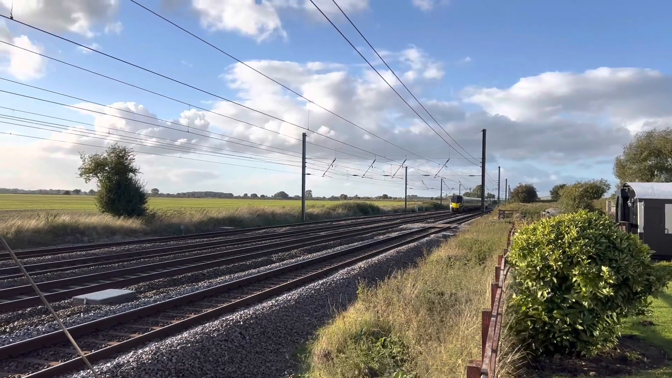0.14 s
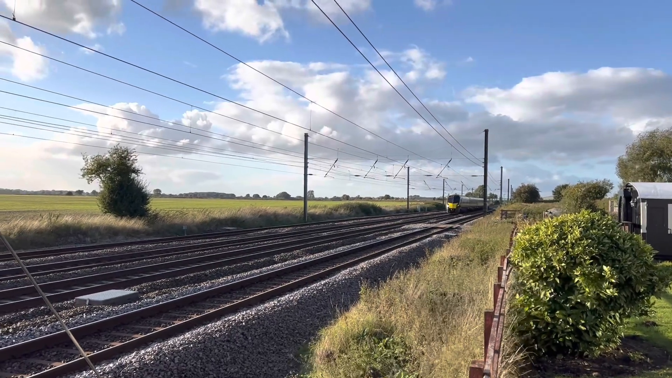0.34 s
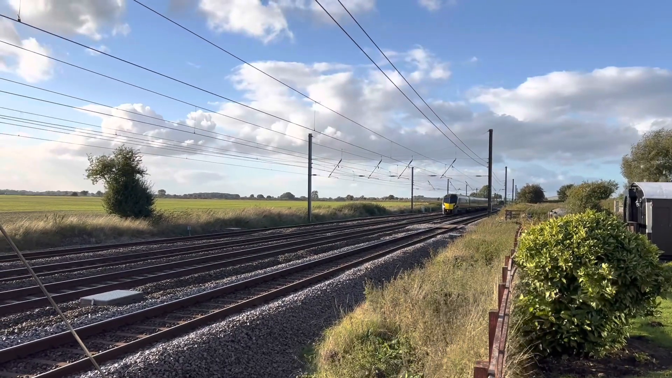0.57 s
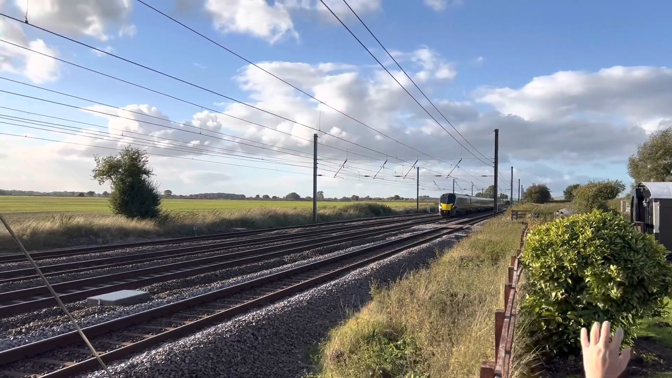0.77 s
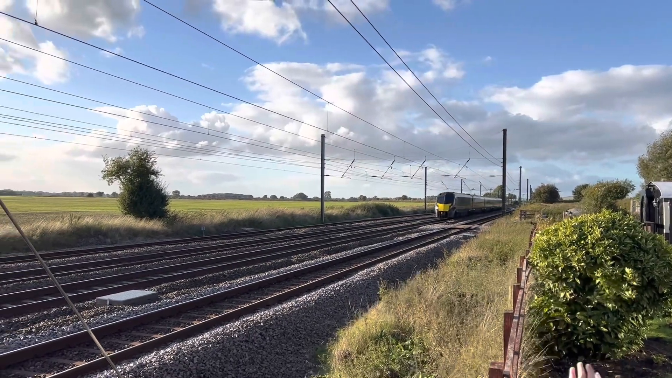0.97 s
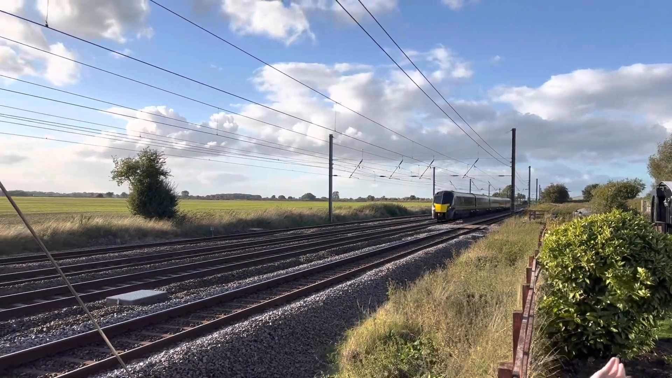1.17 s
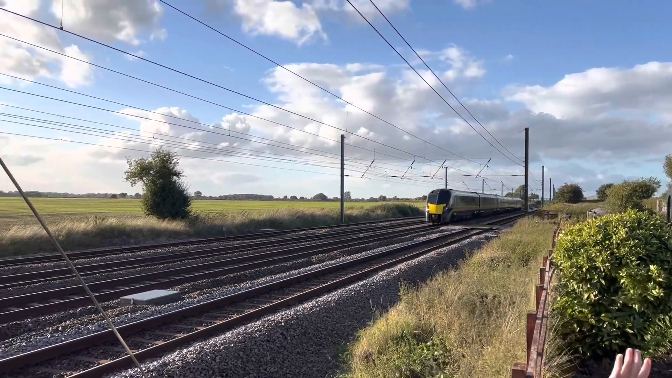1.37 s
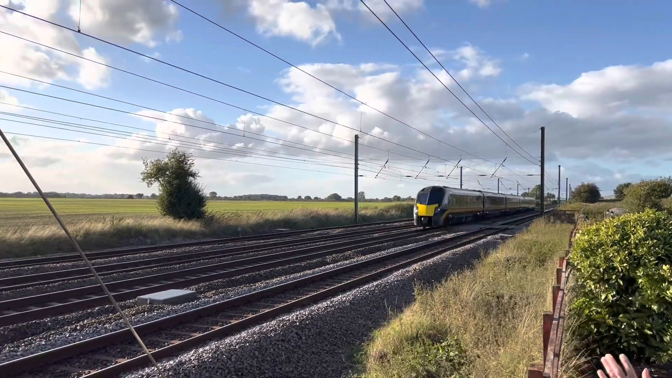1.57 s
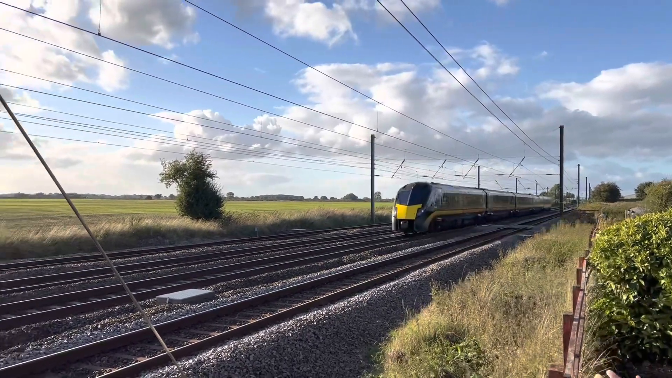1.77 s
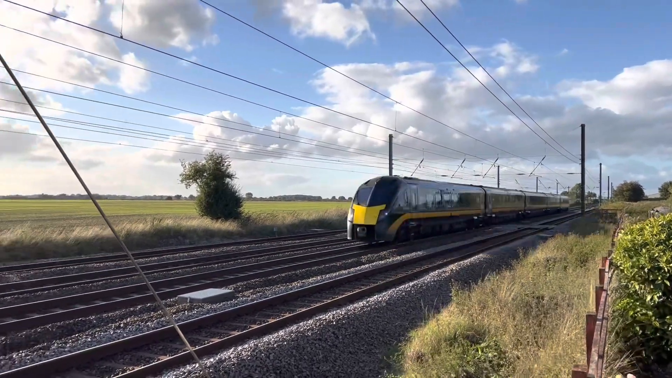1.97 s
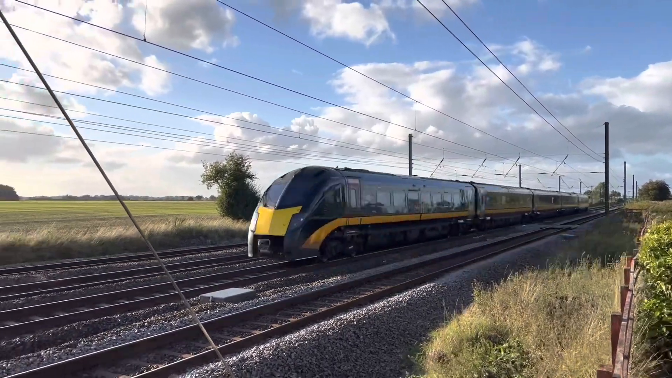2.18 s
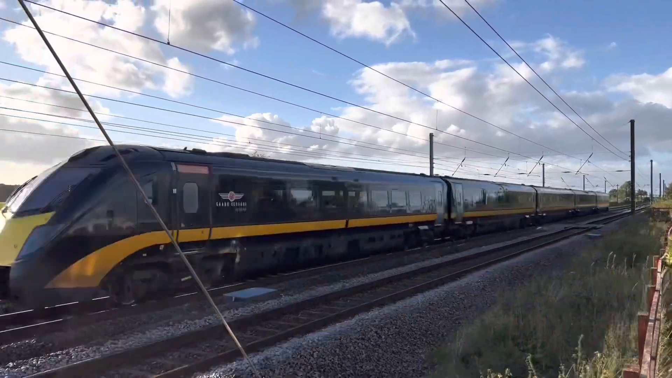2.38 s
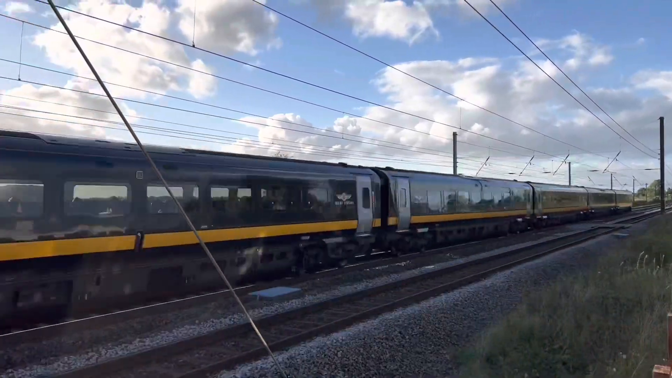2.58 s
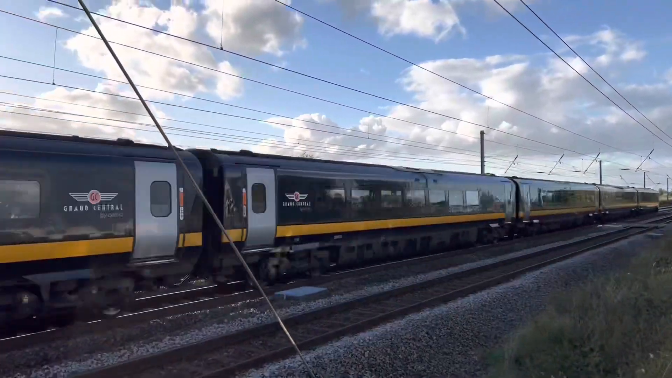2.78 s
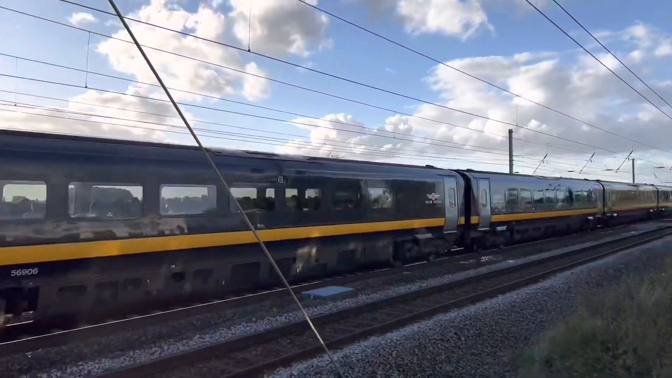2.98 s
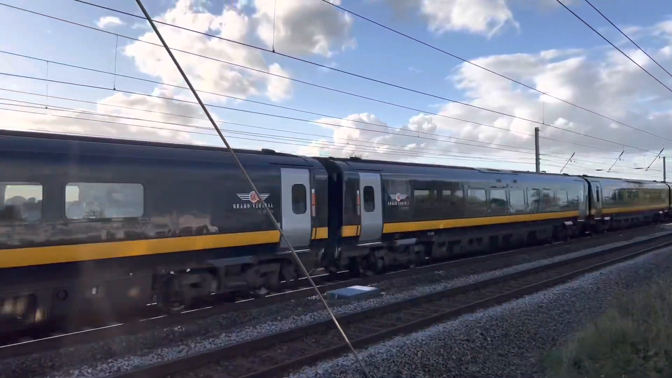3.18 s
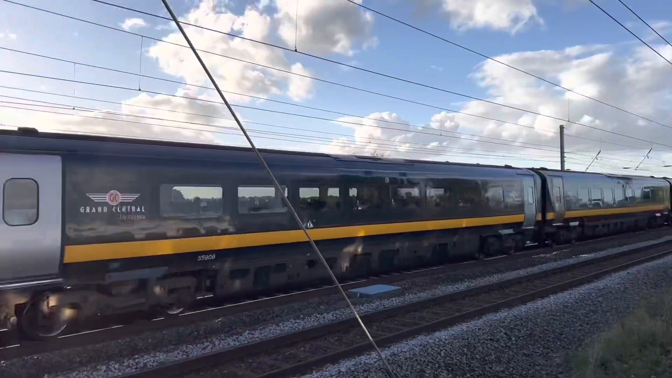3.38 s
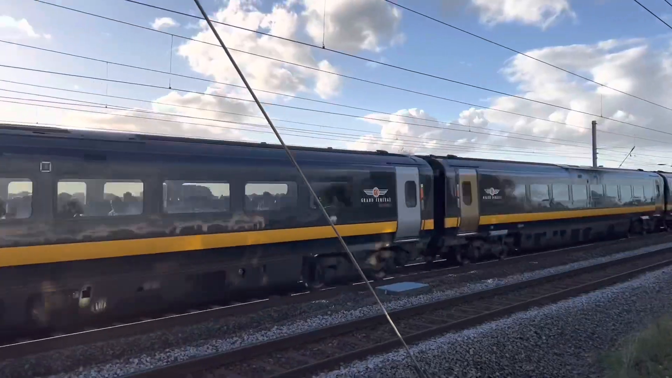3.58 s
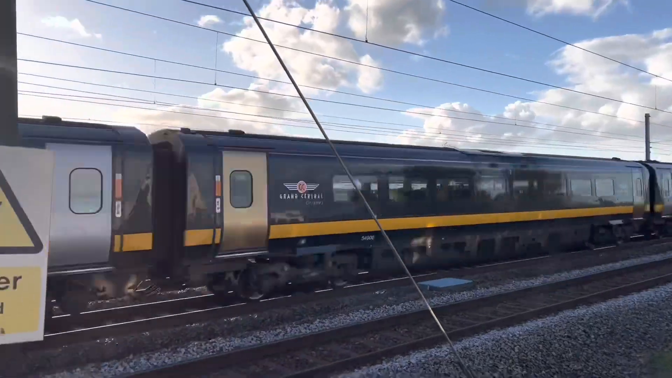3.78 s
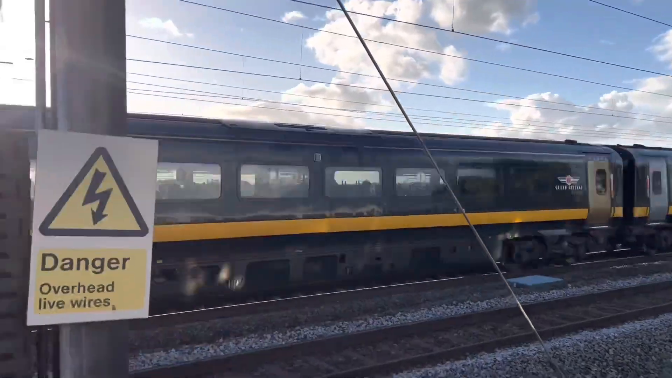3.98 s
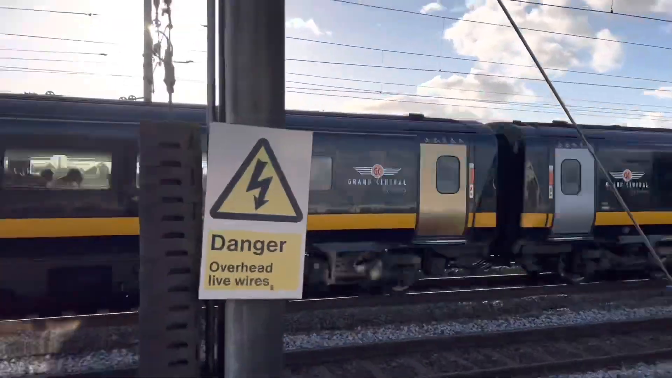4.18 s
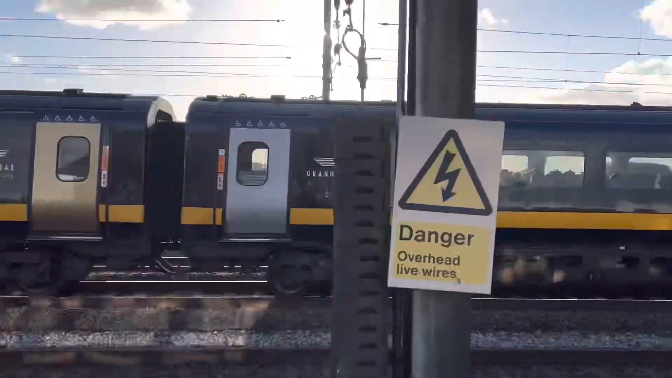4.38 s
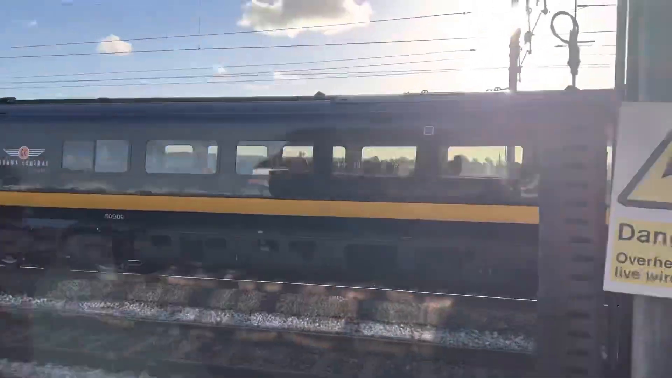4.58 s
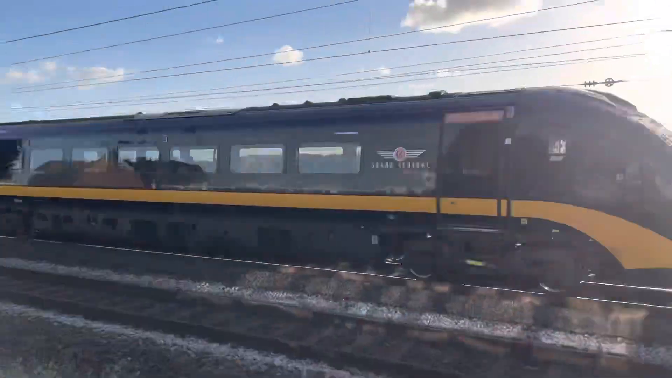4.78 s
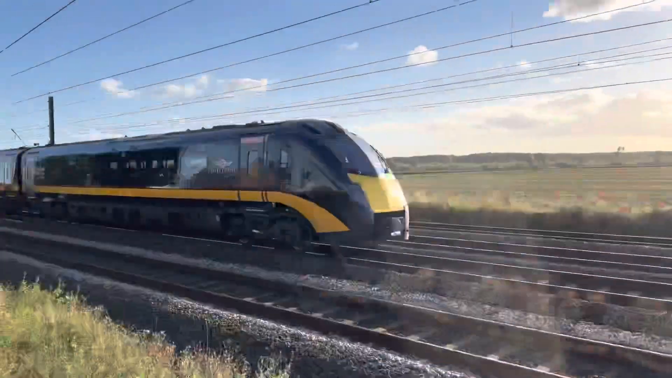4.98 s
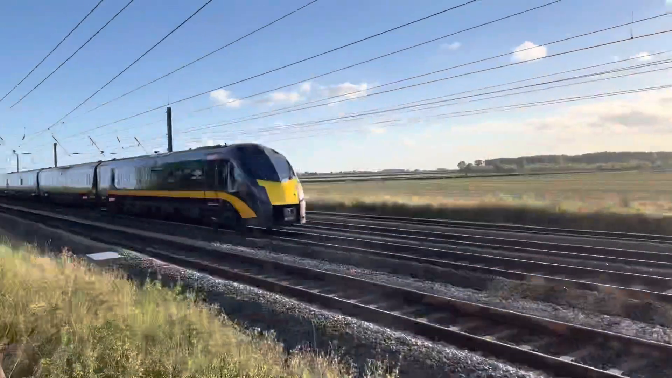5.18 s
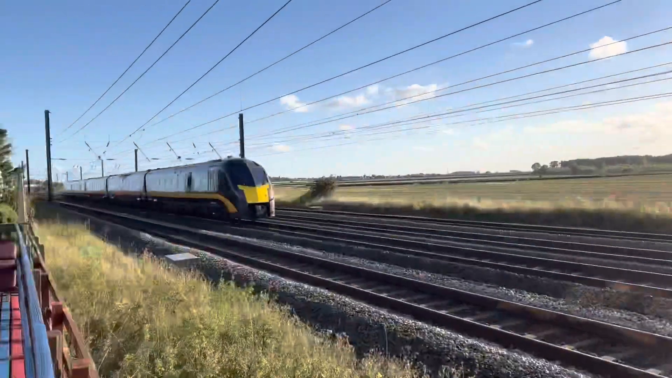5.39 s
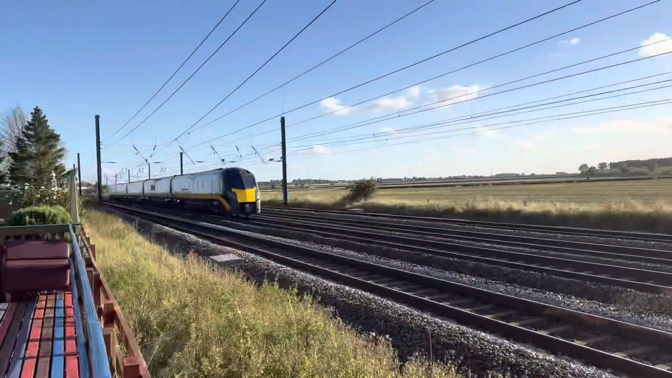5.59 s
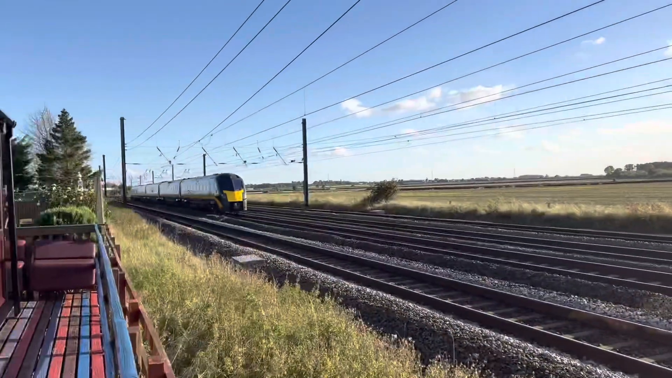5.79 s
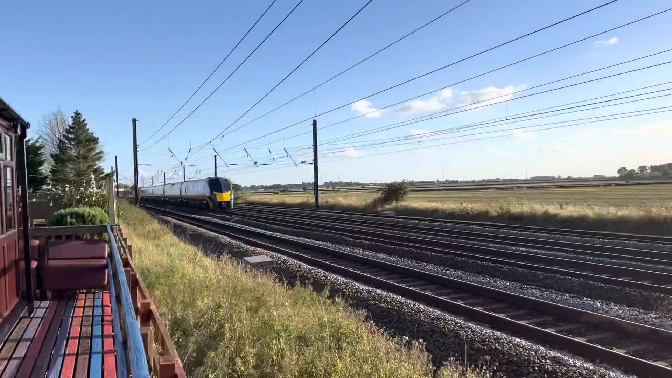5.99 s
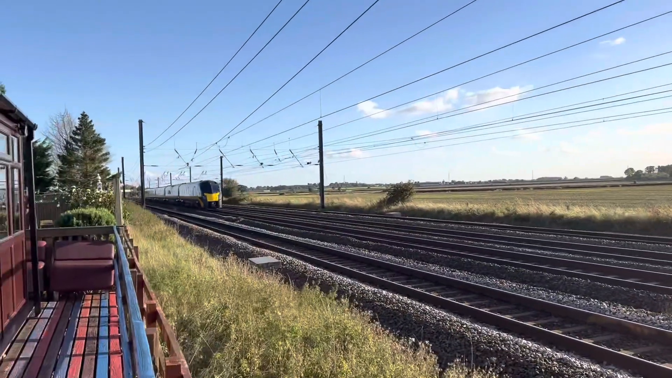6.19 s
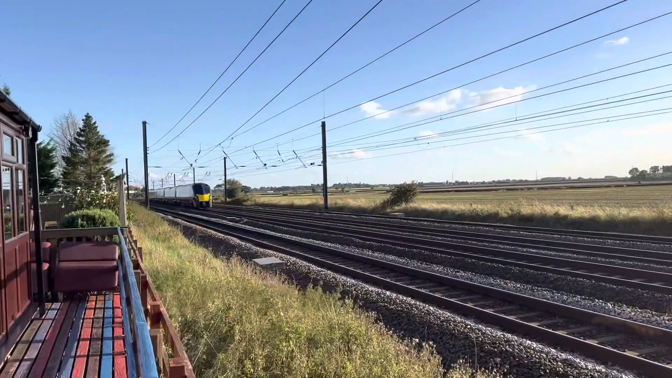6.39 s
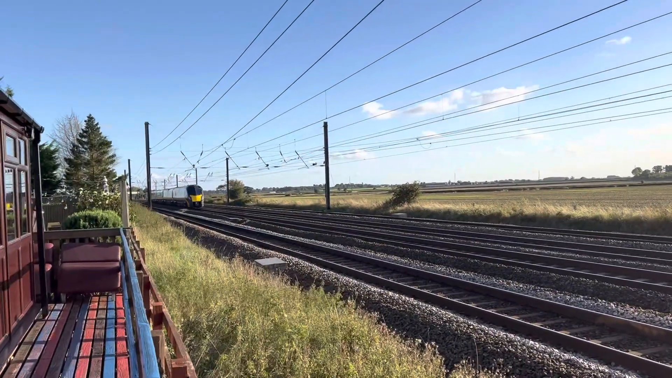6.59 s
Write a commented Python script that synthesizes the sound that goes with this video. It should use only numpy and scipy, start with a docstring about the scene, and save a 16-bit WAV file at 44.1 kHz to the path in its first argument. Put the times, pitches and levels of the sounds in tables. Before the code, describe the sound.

A passenger train passes at speed, close to a microphone held at the trackside in gusty wind. First come a thin, high singing from the rails and a far drone, broken by sharp slaps of wind on the microphone. Then the wheels rush by loudly for about three seconds, ringing and humming over a low flutter of air. The train recedes, and the wind eases with it.

```python
"""A passenger train passes at speed, close to a phone held beside the line in gusty wind.
0-2 s: the rails sing ahead of the train, far wheels drone, wind slaps the microphone ports.
2-5 s: near wheels roar and ring as the bogies go by; the train's draught adds to the buffeting.
From 5 s: the rails sing lower behind the train; roar and wind die away."""
import sys
import numpy as np
from scipy import signal
from scipy.fft import rfft, irfft, next_fast_len
from scipy.io import wavfile
from scipy.ndimage import uniform_filter1d, map_coordinates

SR = 44100
rng = np.random.default_rng(int(sys.argv[2]) if len(sys.argv) > 2 else 0)


def master_out(mix):
    """Clip the mix to full scale and print it as 16-bit PCM to the path in sys.argv[1]."""
    frames = np.transpose(np.atleast_2d(mix))
    ceiling = np.clip(frames, -1, 1)
    pcm = np.round(ceiling * 32767).astype(np.int16)
    wavfile.write(sys.argv[1], SR, pcm)


N = 292989

# the pass: t/s, wheel roar/dB, rail hiss/dB, far drone/dB
PASS_LEVELS = [(0.0, -75, -57, -35.5), (0.44, -48.5, -53.5, -35.5), (0.9, -46.5, -49.5, -32.5),
               (1.35, -40.5, -48, -33.5), (1.7, -35.5, -41.5, -31.5), (2.0, -28.5, -42.5, -26.5),
               (2.24, -24, -39.5, -28.5), (2.47, -18.5, -33.5, -19), (2.77, -17.5, -35.5, -36),
               (3.2, -19.5, -42, -52), (3.32, -17.5, -49, -29.5), (3.6, -19, -48, -24.5),
               (4.15, -22, -38.5, -23.5), (4.5, -22, -38, -22.5), (4.74, -25, -39, -26.5),
               (5.23, -34, -47, -32.5), (5.55, -40.5, -46.5, -35), (6.0, -43.5, -49.5, -35.5),
               (6.64, -48, -53.5, -37.5)]
# train noise spectra: f/Hz, relative level/dB
ROAR_SPECTRUM = [(150, -12), (250, -17.5), (450, -13.5), (670, -2.5), (1050, -6.5), (1490, 0), (1700, -7.5),
                 (1980, -4), (2500, -6.5), (3100, -9), (3400, -8.5), (3890, -11.5), (4940, -12),
                 (8900, -22.5), (11500, -24.5), (13500, -25), (14800, -50), (15500, -57)]
HISS_SPECTRUM = [(4500, -15), (6500, 1), (8000, 3), (10000, -10.5), (11500, 4), (13500, -1.5),
                 (14600, -1.5), (15200, -22), (15500, -44)]
DRONE_AHEAD_SPECTRUM = [(180, -42), (300, -9.5), (541, -7.5), (613, -4.5), (860, -9.5), (962, -3),
                        (1610, -14), (1820, -15), (2830, -26.5), (4390, -30.5), (6000, -41), (7800, -76),
                        (13200, -120)]
DRONE_BEHIND_SPECTRUM = [(180, -24), (300, -9.5), (527, -6), (768, 0.5), (1080, -7), (1240, 0), (1460, -15),
                         (2260, -15.5), (3590, -38), (4280, -44), (6000, -26), (7800, -57), (13200, -120)]
# wheel rings: centre t/s, length/s, centre f/Hz, level/dB
WHEEL_RINGS = [(2.494, .45, 1445, -36), (2.618, 0.37, 4060, -36), (2.63, 0.17, 464, -25),
               (2.76, 0.25, 2300, -24), (2.75, .2, 2450, -28), (2.788, .35, 1920, -26),
               (2.85, .15, 2180, -26), (3.13, 0.25, 655, -26), (3.182, 0.34, 1930, -28),
               (3.409, 0.33, 2450, -36), (3.4, .11, 775, -21), (3.47, .08, 730, -22),
               (3.499, 0.33, 1244, -30), (3.28, .2, 3510, -34), (3.52, 0.41, 2020, -29),
               (3.544, .25, 3770, -36), (3.84, .25, 690, -30), (3.75, .2, 3540, -34), (4.08, .3, 1490, -25),
               (3.15, .3, 1490, -29), (4.24, 0.15, 1553, -25), (4.39, .2, 2020, -27),
               (4.55, .22, 1935, -29), (4.44, 0.14, 700, -21), (4.55, .2, 665, -21), (4.33, .2, 730, -29),
               (4.75, 0.28, 660, -29), (4.51, .25, 1360, -23.5), (4.35, .2, 1440, -26),
               (4.8, 0.14, 2050, -30), (3.9, .25, 2000, -30), (3.0, .2, 2030, -29), (4.83, .25, 1880, -33),
               (5.15, .3, 1960, -34), (4.66, .14, 4250, -36), (5.2, 0.25, 5280, -50),
               (4.902, .45, 719, -32.5), (4.97, 0.12, 1215, -27), (4.86, .22, 3720, -35),
               (5.15, .16, 1170, -32)]
# wheel modes of the faint rings: f/Hz, level/dB
FAINT_MODES = [(1450, -30), (2250, -30), (2700, -34), (3800, -35), (4350, -37)]
# high rail tones: f/Hz, level/dB re the hiss curve
RAIL_TONES_AHEAD = [(6869, -8), (7553, -13), (8856, -14), (10220, -9), (10917, -5), (11590, -11),
                    (12269, -7), (12947, -13), (13631, -16), (14314, -16)]
RAIL_TONES_BEHIND = [(6450, -13), (7084, -4), (7736, -5), (8419, -12), (9065, -14), (10370, -13),
                     (11687, -11), (12333, -10)]
# single rail tones: start t/s, end t/s, f/Hz, level/dB, fall/(dB/s)
RAIL_HUMS = [(0, 1.2, 1310, -57, 3), (.38, .95, 612, -40, 0), (.49, .72, 6869, -53, 15),
             (.95, 1.3, 6869, -50, 8), (1.4, 2.7, 3429, -56, -10), (1.5, 2.68, 2062, -50, -14),
             (1.6, 2.9, 2747, -56, -14), (2.55, 4.9, 2580, -37.5, 2.5), (2.62, 4.68, 1933, -38, 0),
             (4.72, 5.34, 1930, -40, 5), (4.95, 5.32, 3545, -46, 8), (2.9, 4.4, 3235, -48, 1.5),
             (2.7, 4.6, 3963, -46, 1.5), (5, 6.2, 2575, -53, 6), (5.3, 6.4, 3500, -58, 6),
             (5.2, 6.2, 1742, -53, 3), (5.6, 6.7, 1254, -53, 0), (5.7, 6.7, 1170, -51, 0),
             (5.35, 6, 7736, -57, 2)]
# steady wind plus train draught: t/s, thump/dB, flutter/dB
WIND_LEVELS = [(0.0, -29.5, -33), (0.68, -33, -31.5), (0.9, -22.5, -29), (1.75, -24.5, -31),
               (2.25, -27.5, -26), (2.42, -22, -22.5), (3.0, -24.5, -26.5), (3.45, -34, -33),
               (3.9, -29, -28), (4.35, -31.5, -30.5), (4.75, -28, -25.5), (5.1, -32, -31.5),
               (5.3, -31.5, -34), (5.58, -31, -34), (5.65, -36.5, -41.5), (6.64, -43, -44.5)]
# wind noise spectra: f/Hz, relative level/dB
THUMP_SPECTRUM = [(20, -36), (38, -2.5), (58, 5), (110, 2), (160, -9.5), (220, -23.5), (300, -59)]
FLUTTER_SPECTRUM = [(80, -4), (140, 1), (280, -2.5), (420, -7), (700, -34.5), (1500, -60)]
CRACKLE_SPECTRUM = [(200, -8.5), (380, 10.5), (700, 4.5), (1200, -14.5), (2200, -28), (3500, -70),
                    (5500, -53)]
# gusts: start t/s, length/s, thump/dB, flutter/dB, crackle/dB
WIND_GUSTS = [(.01, 0.019, -26, -24, -36), (0.112, 0.015, -33, -28, -28), (0.17, 0.013, -26, -19, -50),
              (0.231, 0.056, -43, -16.5, -32), (0.304, 0.024, -25.5, -23.5, -24.5),
              (.435, 0.043, -23, -31.5, -33), (.51, 0.016, -21, -31, -45), (0.584, 0.014, -40, -24, -23),
              (0.699, 0.0081, -24, -14.5, -36), (0.729, 0.017, -14.5, -20, -15),
              (0.757, 0.013, -25, -19, -28), (0.824, 0.047, -26, -18, -29), (0.896, 0.037, -20, -14, -20),
              (0.989, 0.054, -19, -19, -25.5), (1.113, 0.014, -35, -32, -30), (1.154, 0.02, -31, -20, -31),
              (1.197, 0.046, -37, -26, -26.5), (1.272, 0.029, -35, -16, -23),
              (1.31, 0.044, -19.5, -16.5, -16.5), (1.384, 0.048, -18, -22.5, -30),
              (1.478, 0.043, -30, -26.5, -41), (1.53, 0.058, -17, -28, -44), (1.753, 0.033, -28, -29, -31),
              (1.819, 0.032, -25, -17.5, -22.5), (1.86, 0.08, -26, -17.5, -23),
              (2.079, 0.023, -40, -20, -38), (2.338, 0.035, -38, -20, -30), (2.626, 0.091, -36.5, -23, -49),
              (2.951, 0.033, -20.5, -30, -50), (3.764, 0.036, -27, -23.5, -40),
              (3.952, 0.055, -22.5, -47, -43), (4.473, 0.073, -39, -24, -50), (4.89, 0.034, -29, -29, -43),
              (5.534, 0.032, -28, -47, -54), (6.047, 0.026, -25, -36, -61), (6.376, 0.09, -22.5, -29, -55)]
# air slaps: t/s, relative crack level/dB, relative thud level/dB
AIR_SLAPS = [(0.242, -33, -8), (.294, -34, -5), (0.318, -28, -7), (0.593, -33, -3), (0.699, -30, -11),
             (.7395, -11.5, 2.5), (0.765, -19, -2), (0.853, -18, -7), (0.885, -18, -12), (0.91, -15, -8),
             (.925, -8, 4), (0.997, -11.5, -1), (1.029, -13, -10), (1.114, -21, -12), (1.157, -15.5, -11),
             (1.207, -18, -4), (1.282, -8.5, -7), (1.291, -9, -6), (1.2987, -8.5, -14), (1.327, -15, -4),
             (1.329, -11, -1), (1.333, -6, 4), (1.343, -1, 0), (1.35, -6.5, 6), (1.359, -11.5, -3),
             (1.391, -6, 0), (1.395, -9, 1), (1.399, -11.5, 5), (1.423, -12, -9), (1.475, -16.5, -4),
             (1.557, -19.5, -9), (1.607, -18.5, -12), (1.639, -15, -8), (1.818, -12, -3), (1.822, -8, -1),
             (1.865, -27, -11), (1.873, -10, -7), (1.887, -23, 3), (1.896, -10, -3)]
# likeness of the two ports: f/Hz, coherence/1
TRAIN_COHERENCE = [(60, .9), (300, .87), (640, .75), (1100, .62), (1400, .45), (1800, .6), (2300, .7),
                   (3250, .42), (4100, .55), (5700, .4), (7500, .65), (15000, .75)]
WIND_COHERENCE = [(60, 0.97), (300, 0.91), (1100, 0.73), (1700, 1), (3500, 0.34)]
# port balance: f/Hz, left minus right/dB
TRAIN_BALANCE = [(60, 4), (110, 0.5), (200, 3), (380, 1.5), (700, 2), (1290, 2.5), (2380, -1), (4400, 0.5),
                 (8120, 0.5), (15000, 0)]
WIND_BALANCE = [(380, 0), (700, 5.5), (2400, 4), (4400, 2)]
# phase between the ports: f/Hz, left lead/rad
AHEAD_PHASE = [(100, .1), (500, 0.59), (860, 1.16), (1380, 2.16), (1720, 7.7), (2400, 4.8), (2930, 4.7),
               (4500, 5.5), (8600, 5.5), (11370, 1.5), (12400, 0.71)]
ABREAST_PHASE = [(100, .1), (344, 0.72), (861, 1.12), (1378, 2.25), (1722, 5.08), (2928, 7.66),
                 (4134, 13.14), (4823, 14.6), (5684, 17.7), (6546, 18.16), (8613, 17.6), (11370, 14.65),
                 (12400, 13.9)]
BEHIND_PHASE = [(100, -1.5), (1030, 1.14), (1200, -4), (1720, -0.4), (2930, 1), (4820, 1.3), (5680, 1.1),
                (6550, 0.5), (8600, 1), (11370, -4.5), (12400, -6.5)]
WIND_PHASE = [(100, 0.42), (600, -0.023), (1400, -0.89), (2200, 0.16)]

T_S = np.arange(N) / SR


def train():
    """Wheels and rails; the image swings round as the train arrives and as it leaves."""
    arrive_s, leave_s, swing_s = 2.05, 5.25, 0.42
    roar_db, hiss_db, drone_db = curves(PASS_LEVELS)
    near = wheel_roar(roar_db) + wheel_rings() + rails(hiss_db) + far_drone(drone_db)
    far = near[::-1] * [[1], [-1]]  # channels swapped, one inverted: uncorrelated with near
    ahead = ramp((arrive_s - T_S) / swing_s + .5)
    behind = ramp((T_S - leave_s) / swing_s + .5)
    stages = [(ahead, far, AHEAD_PHASE), (1 - ahead - behind, near, ABREAST_PHASE),
              (behind, far, BEHIND_PHASE)]
    return sum(ports(np.sqrt(np.abs(share)) * pair, TRAIN_COHERENCE, TRAIN_BALANCE, phase)
               for share, pair, phase in stages)


def wheel_roar(level_db):
    """Broadband rolling noise of the near wheels."""
    return amp(level_db + 0.5 * wobble(12)) * shaped_noise(ROAR_SPECTRUM, patchy_db=1.7)


def wheel_rings():
    """Wheels ring as bogies pass: narrow bands swell and slide down, spread by rough contact."""
    slide_per_s, steady_gain = 0.17, 0.4
    faint_count, first_s, last_s = 55, 2.4, 4.75
    faint = []
    for i in range(faint_count):
        hz, db = FAINT_MODES[i % len(FAINT_MODES)]
        centre_s, length_s = rng.uniform(first_s, last_s), rng.uniform(.06, .18)
        faint.append((centre_s, length_s, hz * rng.uniform(.94, 1.06), db))
    out = np.zeros((2, N))
    for centre_s, length_s, hz, db in WHEEL_RINGS + faint:
        progress = np.linspace(0, 1, int(length_s * SR))
        pitch_hz = hz * (1 + slide_per_s * length_s * (.5 - progress))
        tone = np.exp(2j * np.pi * np.cumsum(pitch_hz) / SR)
        knots = rng.standard_normal((2, 2, 160))
        rough_hz = 38 + hz / 90
        at = [progress * length_s * rough_hz]
        rough = np.array([map_coordinates(re, at) + 1j * map_coordinates(im, at) for re, im in knots])
        steady = steady_gain * np.exp(1j * knots[:, 0, :1])
        ring = np.real(tone * (rough + steady)) / np.hypot(1, steady_gain / np.sqrt(2))
        swell = np.sin(np.pi * progress) ** 0.91
        start = int(centre_s * SR) - len(tone) // 2
        out[:, start:start + len(tone)] += amp(db) * swell * ring
    return out


def rails(hiss_db):
    """Rails hiss, sing and hum; the passing wheels damp the singing."""
    treble = amp(1.5) * shaped_noise(HISS_SPECTRUM, patchy_db=2.5)
    treble += ramp((2.45 - T_S) / .5) * rail_singing(RAIL_TONES_AHEAD)
    treble += ramp((T_S - 4.7) / .5) * rail_singing(RAIL_TONES_BEHIND)
    return amp(hiss_db) * treble + sum(rail_hum(*row) for row in RAIL_HUMS)


def rail_singing(tones, width_hz=21):
    """Noise through narrow rail resonances, each swelling on its own."""
    out = np.zeros((2, N))
    size = next_fast_len(N)
    f_hz = np.fft.rfftfreq(size, 1 / SR)
    for hz, db in tones:
        peak = np.exp(-.5 * ((f_hz - hz) / width_hz) ** 2)
        phases = np.exp(2j * np.pi * rng.random((2, len(f_hz))))
        out += amp(db + 1.6 * wobble(8.5)) * unit_rms(irfft(peak * phases, size)[:, :N])
    return out


def rail_hum(start_s, end_s, hz, db, fall_db_per_s):
    """One rail tone, drifting in pitch and level, faded in and out."""
    cycles = np.cumsum(hz + 6 * np.array([wobble(25), wobble(25)]), axis=1) / SR
    fade = ramp(np.minimum(T_S - start_s, end_s - T_S) / 0.039)
    level_db = db - fall_db_per_s * (T_S - start_s) + 2.5 * wobble(16)
    return np.sqrt(2) * fade * amp(level_db) * np.sin(2 * np.pi * cycles)


def far_drone(level_db, abreast_s=3.47, crossfade_s=1.26):
    """Far wheels drone; the spectrum changes as the middle of the train passes."""
    gone = ramp((T_S - abreast_s) / crossfade_s + .5)
    ahead = np.sqrt(1 - gone) * shaped_noise(DRONE_AHEAD_SPECTRUM, patchy_db=2.5)
    behind = np.sqrt(gone) * shaped_noise(DRONE_BEHIND_SPECTRUM, patchy_db=1.5)
    return amp(level_db) * (ahead + behind)


def wind():
    """Eddies thump and flutter at the ports; hard gusts break into a lumpy crackle."""
    thump_db, flutter_db = curves(WIND_LEVELS)
    thump_gust, flutter_gust, crackle_gust = gusts()
    thump = unit_rms(amp(0.91 * wobble(22)) * shaped_noise(THUMP_SPECTRUM, patchy_db=0.5))
    thump *= np.hypot(thump_gust, amp(thump_db + 1.4 * wobble(15)))
    flutter = unit_rms(amp(1.9 * wobble(50)) * shaped_noise(FLUTTER_SPECTRUM, patchy_db=1.0))
    flutter *= np.hypot(flutter_gust, amp(flutter_db + 1.8 * wobble(19)))
    lumps = amp(7 * np.tanh(wobble(130)))
    crackle = unit_rms(lumps * shaped_noise(CRACKLE_SPECTRUM, patchy_db=1.5))
    crackle *= np.hypot(crackle_gust, amp(flutter_db - 9))
    return ports(thump + flutter + crackle + slaps(), WIND_COHERENCE, WIND_BALANCE, WIND_PHASE)


def gusts(rise_s=0.0038, fall_s=0.014):
    """Gains of thump, flutter and crackle: each gust rises fast, holds, decays."""
    power = np.zeros((3, N))
    for start_s, length_s, *levels_db in WIND_GUSTS:
        age_s = T_S - start_s
        envelope = ramp(age_s / rise_s) * np.exp(-np.maximum(age_s - length_s, 0) / fall_s)
        power += (amp(levels_db)[:, None] * envelope) ** 2
    return np.sqrt(power)


def slaps(crack_t60_s=0.012, thud_t60_s=0.02, thud_lead_s=.004):
    """Each slap: a sharp push of air in a short puff, over a longer low thud."""
    cracks, thuds = np.zeros((2, 2, N))
    t_s = np.arange(2000) / SR
    for start_s, crack_db, thud_db in AIR_SLAPS:
        crack_noise, thud_noise = rng.standard_normal((2, 2, len(t_s)))
        crack = crack_noise * t_s * amp(-60 * t_s / crack_t60_s)
        crack *= 0.75 / np.linalg.norm(crack[0])
        crack[0, 90] += np.sign(crack_noise[0, 0])  # the push, 2 ms in
        cracks[:, round(start_s * SR):][:, :len(t_s)] += amp(crack_db + 28) * crack
        thud = thud_noise * t_s * amp(-60 * t_s / thud_t60_s)
        thud[0, 150] += 4 * np.abs(thud).max() * np.sign(thud_noise[0, 0])
        thud /= np.linalg.norm(thud[0])
        thuds[:, round((start_s - thud_lead_s) * SR):][:, :len(t_s)] += amp(thud_db + 25) * thud
    cracks = filtered(cracks, lambda f: band_response(f, 490, q=0.76) * low_response(f, 2100))
    return cracks + filtered(thuds, lambda f: band_response(f, 313, q=0.97) ** 2)


def ports(pair, coherence, balance, phase):
    """Mix two unrelated signals to the coherence, balance and phase gap of the ports."""
    def response(hz):
        mix_rad = np.arccos(np.clip(log_interp(coherence, hz), 0, 1)) / 2
        common, opposed = np.cos(mix_rad), np.sin(mix_rad)
        tilt = amp(log_interp(balance, hz) / 2) * np.exp(.5j * log_interp(phase, hz))
        return np.array([[common * tilt, opposed * tilt], [common / tilt, -opposed / tilt]])
    return filtered(pair, response).sum(axis=1)


def shaped_noise(spectrum, patchy_db):
    """Two noises, rms 1, sharing random time-frequency patches of gain."""
    bins = signal.stft(rng.standard_normal((2, N)), nperseg=512)[2]
    patches = uniform_filter1d(rng.standard_normal(bins.shape[1:]), 5, axis=0)
    patches = uniform_filter1d(patches, 12, axis=1)
    pair = signal.istft(bins * amp(patchy_db * unit_rms(patches)), nperseg=512)[1][:, :N]
    low_hz, high_hz = spectrum[0][0] / 2, spectrum[-1][0] * 2
    return unit_rms(filtered(pair, lambda f: amp(log_interp(spectrum, f)) * (f > low_hz) * (f < high_hz)))


def filtered(x, response):
    """Apply a complex frequency response."""
    size = next_fast_len(N + 8192)
    return irfft(rfft(x, size) * response(np.fft.rfftfreq(size, 1 / SR)), size)[..., :N]


def band_response(f_hz, centre_hz, q):
    """Two-pole band-pass."""
    damping = 1j * f_hz * centre_hz / q
    return damping / (centre_hz ** 2 - f_hz ** 2 + damping)


def low_response(f_hz, corner_hz):
    """Four-pole low-pass."""
    return 1 / (1 + 1.4j * f_hz / corner_hz - (f_hz / corner_hz) ** 2) ** 2


def wobble(rate_hz):
    """Smooth random curve, rate_hz knots a second."""
    knots = rng.standard_normal(int(N * rate_hz / SR) + 4)
    return map_coordinates(knots, [T_S * rate_hz])


def curves(rows):
    """Per-sample values of each column after t/s."""
    times_s, *columns = np.transpose(rows)
    return [np.interp(T_S, times_s, column) for column in columns]


def log_interp(points, hz):
    """Interpolate (f/Hz, value) points on a log frequency axis."""
    f_hz, values = np.transpose(points)
    return np.interp(np.log(hz + 1), np.log(f_hz + 1), values)


def ramp(x):
    return np.clip(x, 0, 1)


def amp(db):
    return 10 ** (np.asarray(db) / 20)


def unit_rms(x):
    return x / np.sqrt(np.mean(x ** 2) + 1e-20)


def scene():
    return train() + wind()


def record(dry):
    """Soft overload and band limit; channels opposite near 10 kHz, almost mono in the top treble."""
    ceiling, mono_hz, top_hz = 1.2, 12450, 15741
    left, right = dry / (1 + np.abs(dry / ceiling) ** 4) ** (1 / 4)
    mid = filtered(left + right, lambda hz: (hz < top_hz) * ((hz < 9080) | (hz > 10950))) / 2
    side = filtered(left - right, lambda hz: (hz < top_hz) * np.where(hz > mono_hz, amp(-24), 1)) / 2
    return np.array([mid + side, mid - side])


dry = scene()
out = record(dry)
master_out(out)
```